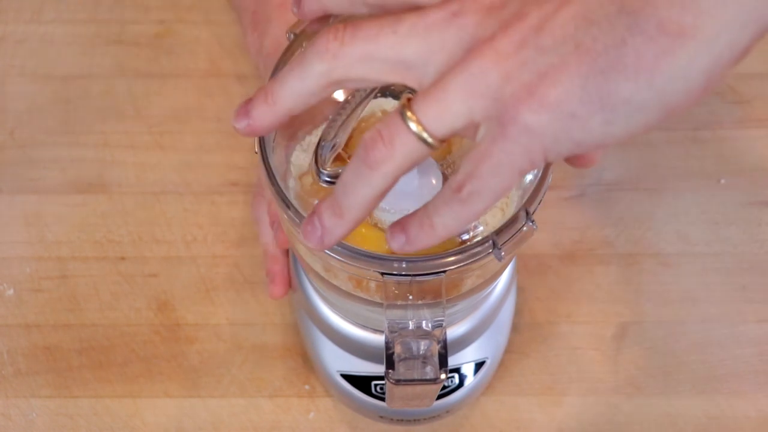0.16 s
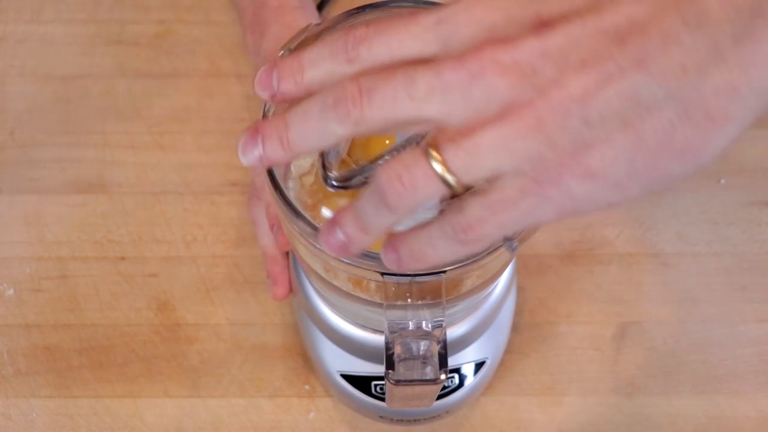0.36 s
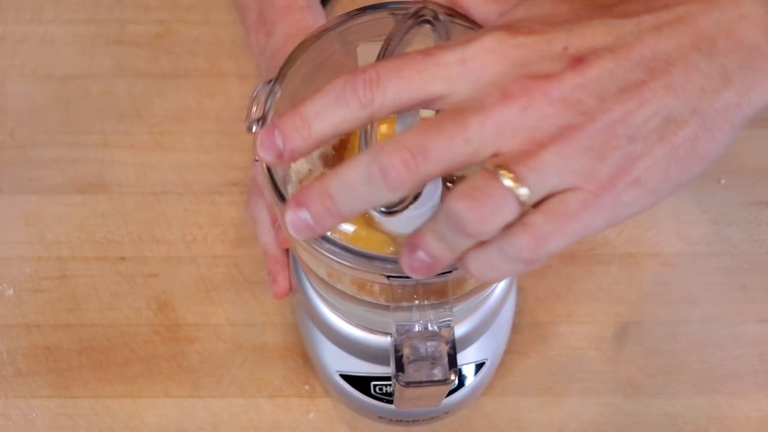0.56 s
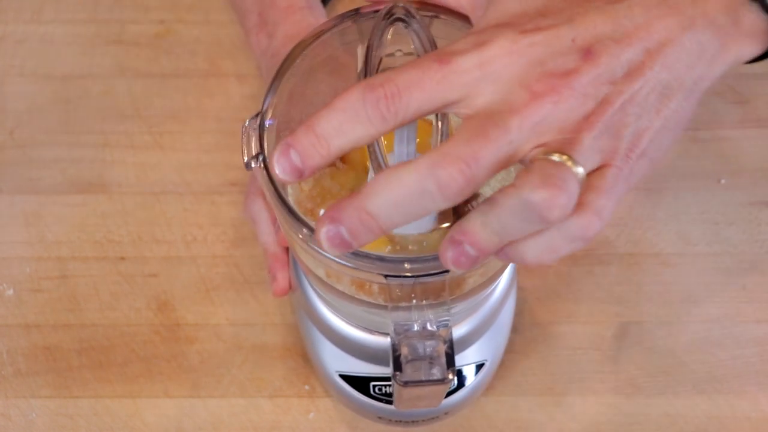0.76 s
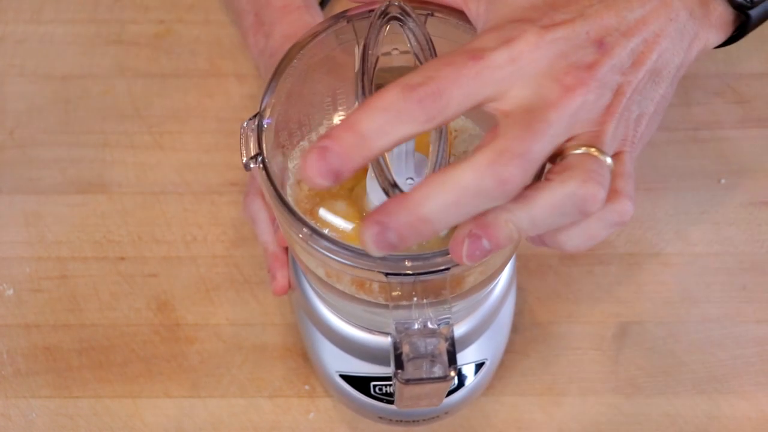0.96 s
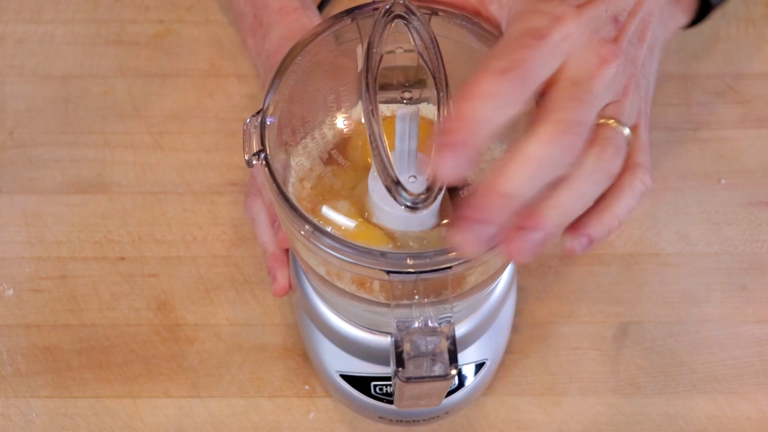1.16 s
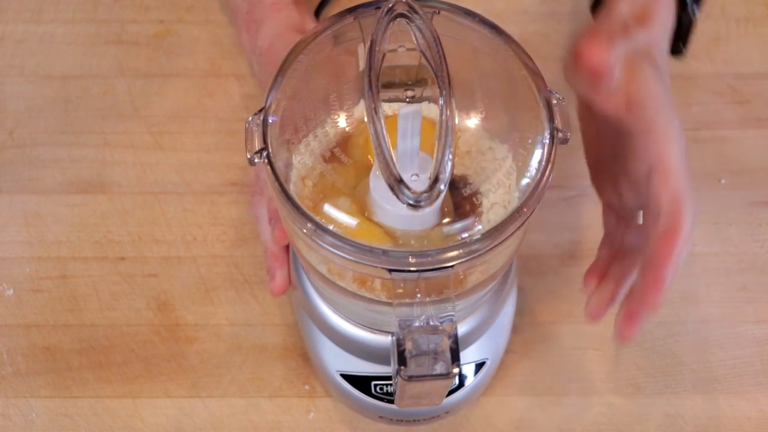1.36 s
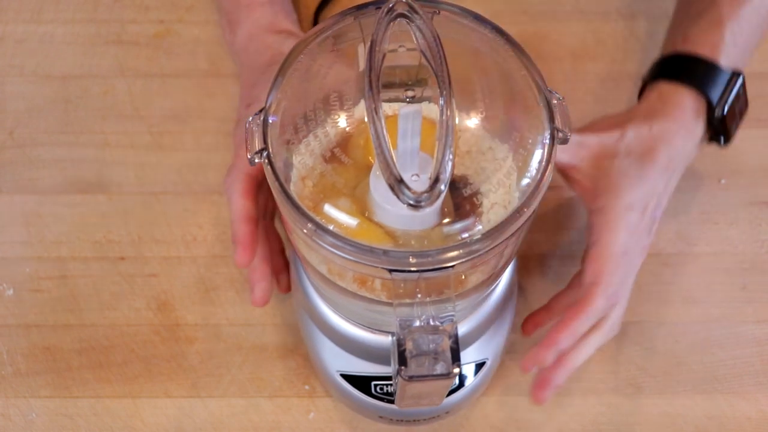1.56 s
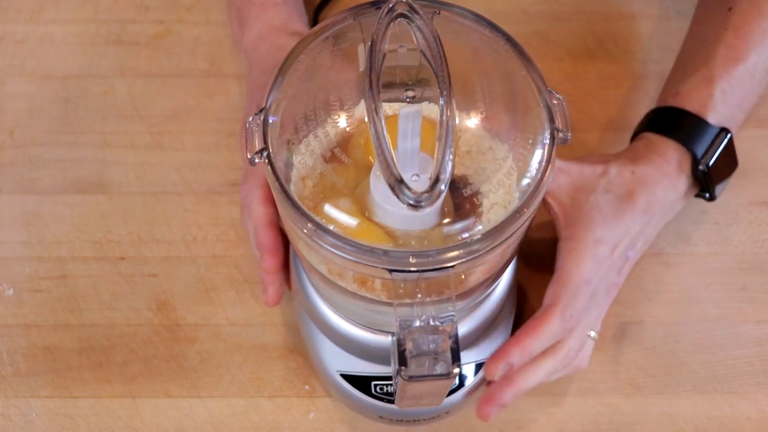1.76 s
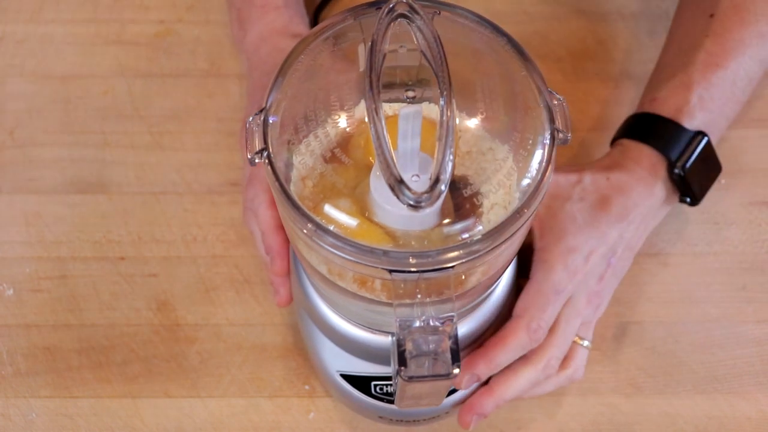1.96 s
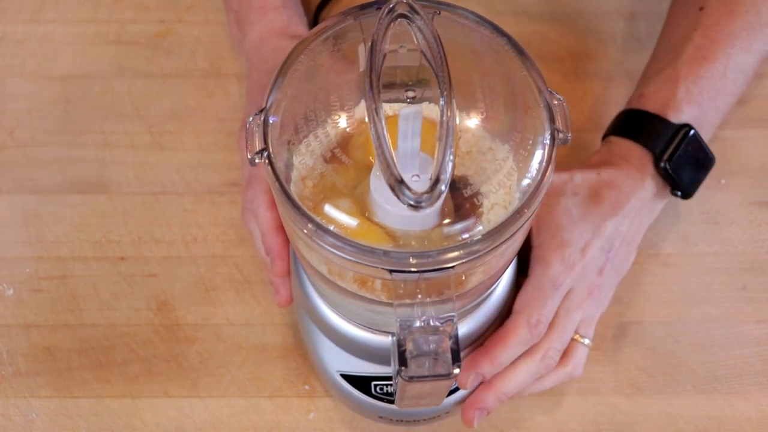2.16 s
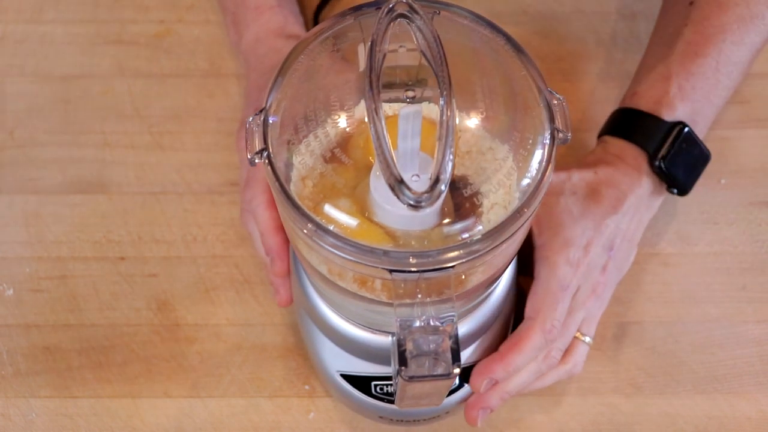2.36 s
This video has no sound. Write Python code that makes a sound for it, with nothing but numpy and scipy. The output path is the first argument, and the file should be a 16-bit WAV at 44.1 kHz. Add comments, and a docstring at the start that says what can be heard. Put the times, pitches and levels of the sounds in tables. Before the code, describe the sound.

Hard plastic lid clacks onto a bowl, rattles and rubs, then clicks sharply into its lock.

```python
"""Lid locking onto a food processor

A clear plastic lid knocks onto the bowl, rocks, scrapes round and snaps into its lock.
Small ticks come before and after the snap. Knocks and clicks are fading sine waves with a noisy crack;
low thumps, mostly the bass body of the knocks and snap, are short low sines.
Rubbing, the palm and the ticks are shaped noise. Noise echoes make the hard-walled kitchen.
A fridge hum of steady tones with air noise lies underneath, and all sound drops out briefly near the start.
"""
import sys
import numpy as np
from scipy import signal
from scipy.fft import rfft, irfft
from scipy.io import wavfile
from scipy.ndimage import uniform_filter1d

SR = 44100
rng = np.random.default_rng(int(sys.argv[2]) if len(sys.argv) > 2 else 0)


def put_to_file(sound):
    """Save the sound as 16-bit audio at rate SR, in the file named by the first command-line argument."""
    columns = np.atleast_2d(sound).T  # one column per channel
    safe = np.clip(columns, -1, 1)
    whole_steps = np.round(safe * 32767)
    wavfile.write(sys.argv[1], SR, whole_steps.astype(np.int16))


N = 105707  # length in samples

# Steady fridge tones. Each row: pitch in Hz, average (RMS) level in dB.
HUM_TONES = [(118.4, -61.5), (236.9, -60.5), (473.7, -66), (764.4, -80), (963.6, -73)]
# Colour of the kitchen's air noise. Each row: frequency in Hz, relative level in dB per Hz.
AIR_COLOUR = [(15, -41), (25, -13.5), (167, -14), (232, -7.5), (321, -17), (470, -16), (651, -22),
              (952, -22.5), (2670, -40), (15200, -47.5), (16500, -67)]
# Ways the lid vibrates while loose in the hand.
# Each row: pitch in Hz, relative level in dB, time to fade by 60 dB in seconds.
LOOSE_MODES = [(383, -2, 0.061), (516, -5, 0.041), (677, -3.5, .1), (780, -10, 0.058), (1055, -15.5, 0.078),
               (1458, -14.5, .08), (1620, -26, .1), (1768, 4.5, 0.11), (1750, -15.5, 0.075),
               (2102, -8, 0.11), (2616, -1, 0.07), (3164, -9.5, .05), (3760, -7, 0.044), (5210, -15, 0.044),
               (6630, -17, 0.051)]
# Ways lid and bowl vibrate once the lid is seated.
# Each row: pitch in Hz, relative level in dB, time to fade by 60 dB in seconds.
SEATED_MODES = [(570, -28.5, .04), (746, -1, .035), (838, -2, 0.026), (1010.6, -12, .04), (1188, -1, .04),
                (1324, -4, .025), (1426, 0, 0.012), (1547, 1, .03), (1952, 8.5, 0.01), (2207, -4.5, .03),
                (2764, -2, .015), (3640, -16.5, 0.043), (4929, -17, 0.0033), (6310, -5, .012),
                (7170, -4.5, .008)]
# Knocks of the loose lid on the rim. Each row: start in seconds, relative level in dB,
# first blow against the rebounds in dB, rebound time in seconds, bass change in dB, treble change in dB.
LOOSE_KNOCKS = [(.098, -46.5, 27, .002, -8, -10), (.1042, -2, 7, .001, 0, -6),
                (.2495, -26, 5, 0.0011, 7, -23)]
# Clicks of the seated lid. Each row: start in seconds, relative level in dB,
# first blow against the rebounds in dB, rebound time in seconds, bass change in dB, treble change in dB.
SEATED_CLICKS = [(.259, -27, -3, 0.0056, 4.5, -44), (.2668, -24, 4, 0.0028, 2.5, -11.5),
                 (.498, -47.5, -17, .003, 6.5, -18), (.505, -42.5, -17, 0.0046, 6, -10),
                 (.566, -28, -13.5, .003, -7.5, -7.5), (.622, -27, -13.5, .003, -5, 1.5),
                 (.702, -43, -7.5, 0.00099, 6, -18.5), (.718, -34.5, -6, 0.0013, -36, -12),
                 (.737, -20.5, -11, .005, -14.5, -5.5), (.756, -37.5, -8, .003, 8, 4),
                 (.775, -35, -16, .007, 7, 0), (.799, -29.5, -18, .003, 3, 7.5),
                 (.8378, 0, -20.5, .0015, -2, 1), (1.02, -48, -30, 0.004, 9, -9),
                 (1.0945, -25.5, -15, 0.00067, -39, 3), (1.144, -36, -6.5, 0.0035, -6, -16),
                 (1.18, -45, -5, 0.0023, -2, -11.5), (1.230, -34, 1.5, 0.00091, -8, 4.5),
                 (1.447, -57.5, 5, .001, -10, -2), (1.49, -57, -10, .006, -12, -14),
                 (1.625, -53, 20, 0.00033, 10.5, 9.5)]
# Colour of the noisy crack in each hit. Each row: frequency in Hz, relative level in dB.
CRACK_COLOUR = [(1500, -25.5), (3000, -6), (7000, -1.5), (11000, -14), (16000, -17.5)]
# Broad splash that a loose hit scatters into the room. Each row: frequency in Hz, relative level in dB.
LOOSE_SPLASH = [(200, -17.5), (400, 3.5), (750, -5), (1300, -3.5), (1800, -2.5), (3000, -5), (6000, -2.5),
                (10000, -13.5), (16000, -20.5)]
# The same splash for a seated hit. Each row: frequency in Hz, relative level in dB.
SEATED_SPLASH = [(300, -18), (600, 6.5), (1200, 6), (2200, -0.5), (4000, -9.5), (7000, -3.5), (11000, -17),
                 (14000, -13.5), (16000, -18)]
# Kitchen echo bands. Each row: centre in Hz, relative level in dB, time to fade by 60 dB in seconds.
ROOM_BANDS = [(261.2, -7, 0.39), (463, -3, 0.411), (982, 0, 0.35), (1850, 0.5, 0.34), (4000, -2.5, 0.38),
              (8000, -8.5, 0.31), (13000, -0.5, 0.13)]
# Low thumps, mostly the bass body of the knocks and snap.
# Each row: start in seconds, relative level in dB, pitch in Hz.
LOW_THUMPS = [(0.104, -36, 200), (.2665, -21, 210), (.742, -49.5, 59.16), (.838, -33, 40.1),
              (1.627, -41, 306)]
# Lid rubbing on the rim and under the fingers. Each row: time in seconds, level in dB.
RUB_LEVEL = [(.3, -91), (.37, -61), (.41, -63), (.45, -50.5), (.485, -64), (.51, -54.5), (.56, -49.5),
             (.585, -58.5), (.64, -53), (.685, -71), (.72, -57.5), (.79, -58.5), (.83, -47)]
# Colour of that rubbing. Each row: frequency in Hz, relative level in dB per Hz.
RUB_SPECTRUM = [(300, -6), (1300, -3.5), (1600, -3.5), (2800, -5.5), (4000, -14.5), (8000, -10),
                (13000, -22), (16000, -26)]
# A palm settling on the housing. Each row: time in seconds, level in dB.
PALM_LEVEL = [(1.6, -84), (1.65, -60), (1.75, -71.5), (1.9, -70), (2.05, -77)]
# Colour of the palm sound. Each row: frequency in Hz, relative level in dB.
PALM_SPECTRUM = [(400, -23), (1000, -0.5), (1800, 0.5), (2600, -13), (5000, -27.5)]
# A finger leaving the plastic. Each row: start in seconds, relative level in dB, centre in Hz, width in Hz.
FINGER_TICKS = [(.365, -62.5, 6000, 5000), (0.7217, -46.5, 10000, 9000), (0.757, -36.5, 10900, 8960),
                (1.538, -45.5, 10000, 9000), (1.5425, -53, 5060, 3000), (1.547, -35.5, 7450, 2870),
                (1.755, -59.5, 9080, 8000), (2.21, -62, 4000, 4000)]

HUM_WAVER_DB, HUM_WAVER_HZ = 0.5, 12
AIR_DB, AIR_SWELL_DB, AIR_SWELL_HZ = -58, 0.6, 18
REBOUNDS_PER_S = 4000  # average rate of random rebounds
SCATTER_DB = 1.5  # spread of mode levels from hit to hit
DETUNE = 0.004  # each mode's pitch varies at random from hit to hit by up to this fraction
CRACK_DB, CRACK_FADE_S = -4, 0.0022
SPLASH_DB = 27
RING_SEND_DB, RING_SEND_HZ = -3, 3000  # share of the loose ring sent to the room, and its upper edge
ROOM_DB, ROOM_BUILD_S = -13, 0.0069
RUB_GRAIN_DB, RUB_GRAIN_HZ = 1.5, 100
TICK_FADE_S = 0.0024
LOW_CUT_HZ, TOP_HZ = 260, 16100
GAP_START_S, GAP_END_S, GAP_FADE_S = 0.08, 0.0957, 0.0037
BEFORE_GAP_DB = -1.5
CEILING = 0.95  # clipping level, full scale is 1


def undb(db):
    """Turn decibels into a multiplier."""
    return 10 ** (np.asarray(db) / 20)


def unit(x):
    """Scale a signal to an average (RMS) strength of 1."""
    return x / np.sqrt(np.mean(x ** 2))


def level_at(hz, points):
    """Read a dB curve at given frequencies, with straight lines on a log frequency scale."""
    points = np.array(points, float)
    return np.interp(np.log(hz), np.log(points[:, 0]), points[:, 1])


def colour(x, points):
    """Make each frequency louder or softer, following a dB curve."""
    hz = np.fft.rfftfreq(len(x), 1 / SR) + 1  # the 1 avoids log of zero
    return irfft(rfft(x) * undb(level_at(hz, points)), len(x))


def walk(rate):
    """Smooth noise twice to get a slow random drift with a spread of 1."""
    width = int(SR / rate)
    once = uniform_filter1d(rng.standard_normal(N), width)
    return unit(uniform_filter1d(once, width))


def add(out, at, x):
    """Mix a short sound into a long one, starting at a time in seconds."""
    i = int(at * SR)
    out[i:i + len(x)] += x[:N - i]


def fridge(t):
    """Humming tones waver a little in level, over air noise that swells slightly."""
    hum = np.zeros(N)
    for hz, db in HUM_TONES:
        level = np.sqrt(2) * undb(db + HUM_WAVER_DB * walk(HUM_WAVER_HZ))
        hum += level * np.sin(2 * np.pi * (hz * t + rng.random()))
    air = unit(colour(rng.standard_normal(N), AIR_COLOUR))
    return hum + air * undb(AIR_DB + AIR_SWELL_DB * walk(AIR_SWELL_HZ))


def plastic_ring(t, modes, tilt):
    """Struck plastic vibrates at several pitches at once, each fading at its own speed."""
    modes = np.array(modes)
    hz, db, fade_s = modes[:, :1], modes[:, 1], modes[:, 2:]
    gain = undb(db + SCATTER_DB * rng.standard_normal(len(modes)) + level_at(modes[:, 0], tilt))
    shift = 1 + DETUNE * (2 * rng.random((len(modes), 1)) - 1)
    return gain @ (np.sin(2 * np.pi * hz * shift * t) * 1000. ** (-t / fade_s))


def crack(t, treble_db):
    """The hard contact gives a burst of noise that dies away quickly."""
    noise = unit(colour(rng.standard_normal(len(t)), CRACK_COLOUR))
    return noise * np.exp(-t / CRACK_FADE_S) * undb(CRACK_DB + treble_db)


def blow_and_rebounds(t, blow_db, chatter_s):
    """One first blow, then a random swarm of small pushes that swells and fades."""
    rise = t[:2048] / chatter_s
    chance, push = rng.random((2, 2048))
    swarm = (chance < REBOUNDS_PER_S / SR) * (2 * push - 1) * rise * np.exp(-rise)
    pushes = swarm / np.linalg.norm(swarm) + undb(blow_db) * (rise == 0)
    return pushes / np.linalg.norm(pushes)


def hits(table, modes, splash_colour):
    """Blows and rebounds set off ring and crack; a broad splash is kept apart for the room."""
    direct, splash = np.zeros(N), np.zeros(N)
    t = np.arange(SR // 4) / SR
    click = 1. * (np.arange(1024) == 128)  # a single pulse, to be coloured
    for at, db, blow_db, chatter_s, bass_db, treble_db in table:
        tilt = [(800, bass_db), (1400, 0.022), (2500, 0.01), (5000, treble_db)]  # (Hz, dB)
        body = plastic_ring(t, modes, tilt) / 2 + crack(t, treble_db)
        pushes = blow_and_rebounds(t, blow_db, chatter_s)
        add(direct, at, undb(db) * signal.fftconvolve(body, pushes))
        add(splash, at, undb(db + SPLASH_DB) * colour(colour(click, splash_colour), tilt))
    return direct, splash


def room(x):
    """Echoes off hard walls build up, then each frequency band dies at its own rate."""
    t = np.arange(int(.7 * SR)) / SR
    tail = np.zeros(len(t))
    for hz, db, fade_s in ROOM_BANDS:
        edges = [(hz / 2, -30), (hz / 1.5, 0), (hz * 1.3, 0), (hz * 2, -30)]
        band = colour(rng.standard_normal(len(t)), edges)
        tail += band * undb(db) * 1000. ** (-t / fade_s)
    tail *= 1 - np.exp(-(t / ROOM_BUILD_S) ** 2)
    return undb(ROOM_DB) * signal.fftconvolve(x, tail / np.linalg.norm(tail))[:N]


def thumps():
    """Each low thump is a sine that dies away quickly."""
    out, t = np.zeros(N), np.arange(4096) / SR
    for at, db, hz in LOW_THUMPS:
        add(out, at, undb(db) * np.sin(2 * np.pi * hz * t) * np.exp(-2 * hz * t))
    return out


def rub(t, levels, spectrum):
    """Friction on plastic is noise with an uneven, grainy level that follows the hand."""
    levels = np.array(levels)
    grain = rng.standard_normal(N) * undb(RUB_GRAIN_DB * walk(RUB_GRAIN_HZ))
    hand_db = np.interp(t, levels[:, 0], levels[:, 1], -120, -120)
    return unit(colour(grain, spectrum)) * undb(hand_db)


def ticks():
    """A finger leaving the plastic makes a very short noise burst around one pitch."""
    out, t = np.zeros(N), np.arange(1024) / SR
    for at, db, hz, width in FINGER_TICKS:
        b, a = signal.iirpeak(hz, hz / width, SR)
        burst = rng.standard_normal(1024) * np.exp(-t / TICK_FADE_S)
        narrow = signal.lfilter(b, a, signal.lfilter(b, a, burst))
        add(out, at, undb(db) * 2 * narrow)
    return out


def dropout(t):
    """Silence everything for a moment; the sound before it is slightly softer."""
    outside = np.maximum(GAP_START_S - t, t - GAP_END_S)
    before = undb(BEFORE_GAP_DB * (t < GAP_START_S))
    return np.clip(outside / GAP_FADE_S, 0, 1) * before


def scene():
    """Mix the lid and its echoes with the thumps and the fridge."""
    t = np.arange(N) / SR
    loose, loose_splash = hits(LOOSE_KNOCKS, LOOSE_MODES, LOOSE_SPLASH)
    seated, seated_splash = hits(SEATED_CLICKS, SEATED_MODES, SEATED_SPLASH)
    small = rub(t, RUB_LEVEL, RUB_SPECTRUM) + ticks() + rub(t, PALM_LEVEL, PALM_SPECTRUM)
    low_pass = signal.butter(2, RING_SEND_HZ, fs=SR, output="sos")
    ring_send = undb(RING_SEND_DB) * signal.sosfilt(low_pass, loose)
    echoes = room(loose_splash + seated_splash + ring_send + small)
    low_cut = signal.butter(2, LOW_CUT_HZ, "high", fs=SR, output="sos")
    lid = signal.sosfilt(low_cut, loose + seated + small + echoes)
    return ((lid + thumps() + fridge(t)) * dropout(t))[None]


def record(dry):
    """Peaks above the ceiling overload the input and flatten; then the top is cut."""
    top_cut = signal.ellip(8, .2, 60, TOP_HZ, fs=SR, output="sos")
    return signal.sosfilt(top_cut, np.clip(dry, -CEILING, CEILING))


dry = scene()
out = record(dry)
put_to_file(out)
```